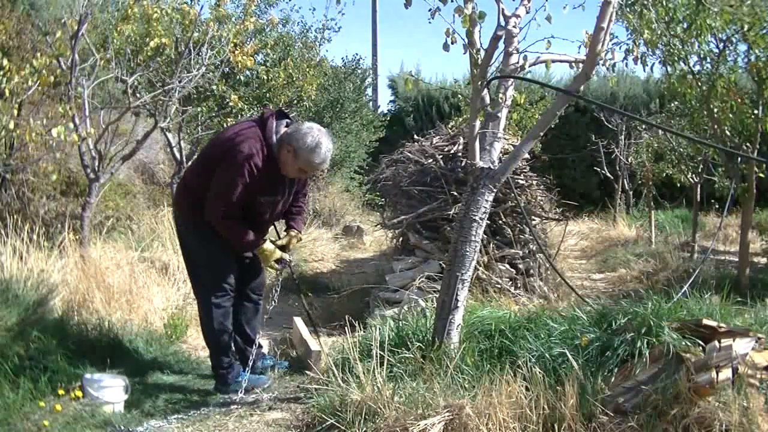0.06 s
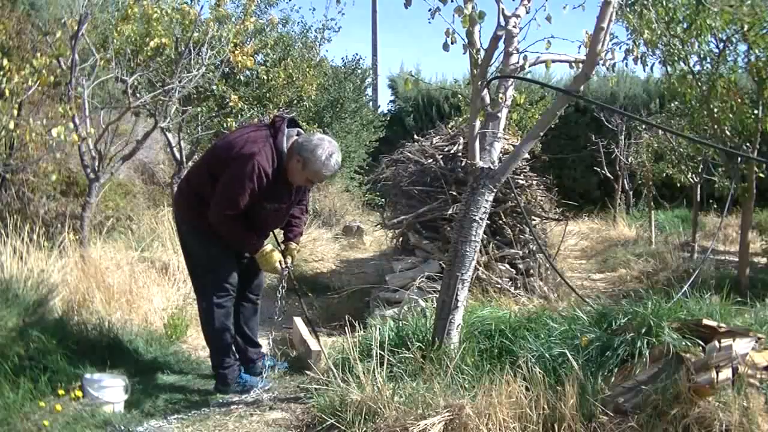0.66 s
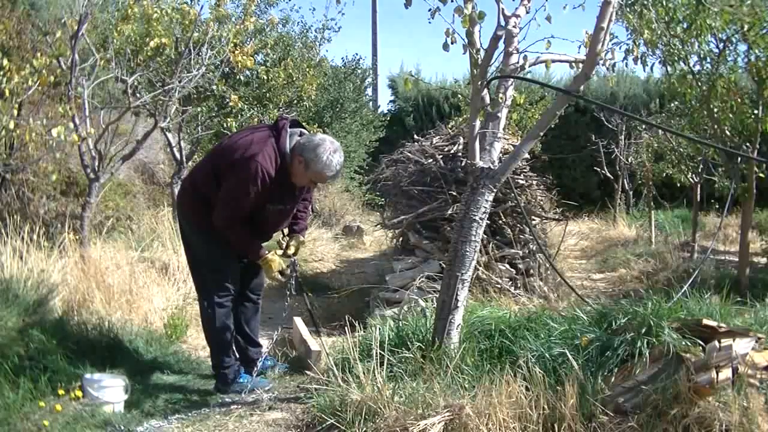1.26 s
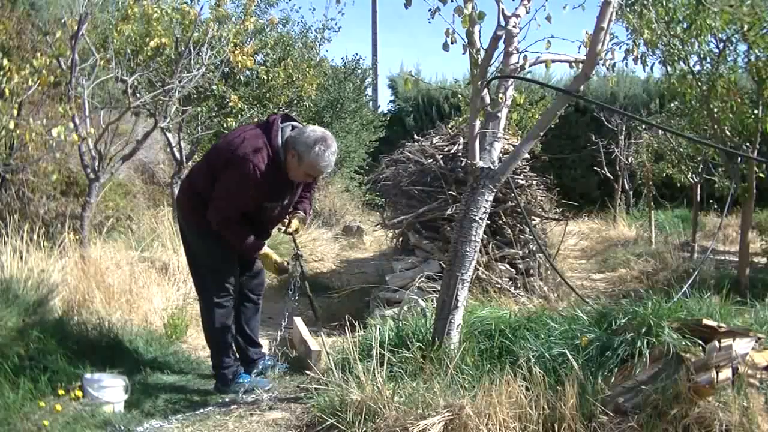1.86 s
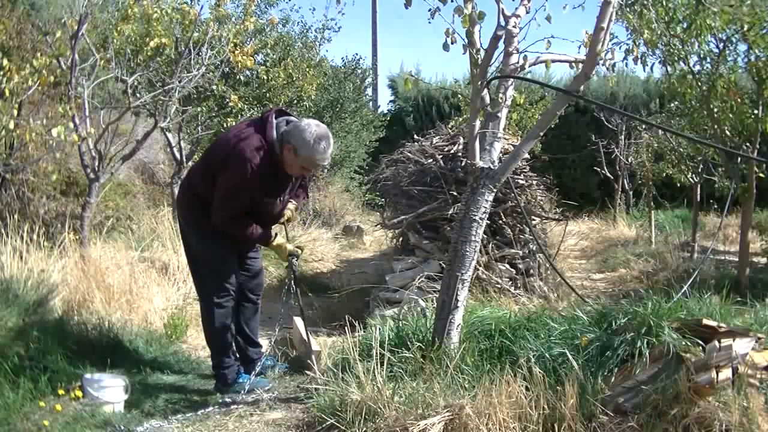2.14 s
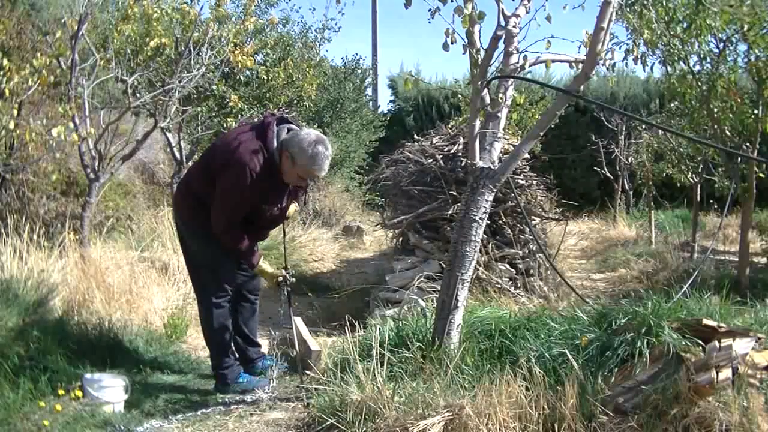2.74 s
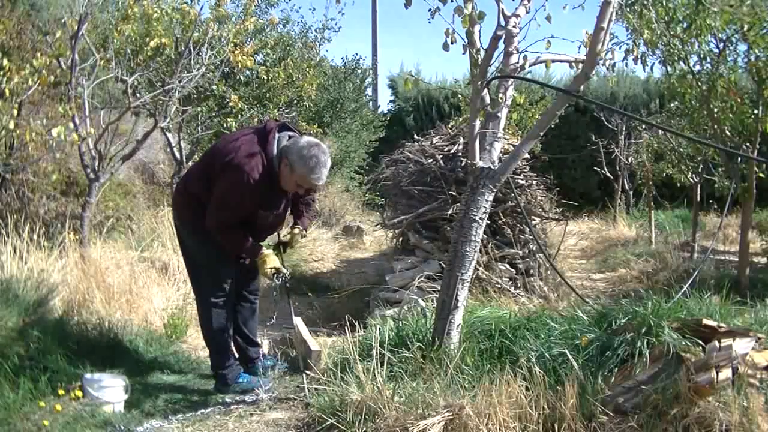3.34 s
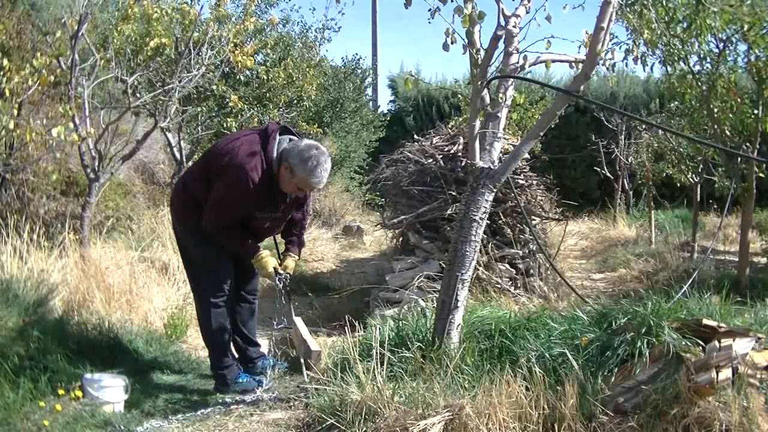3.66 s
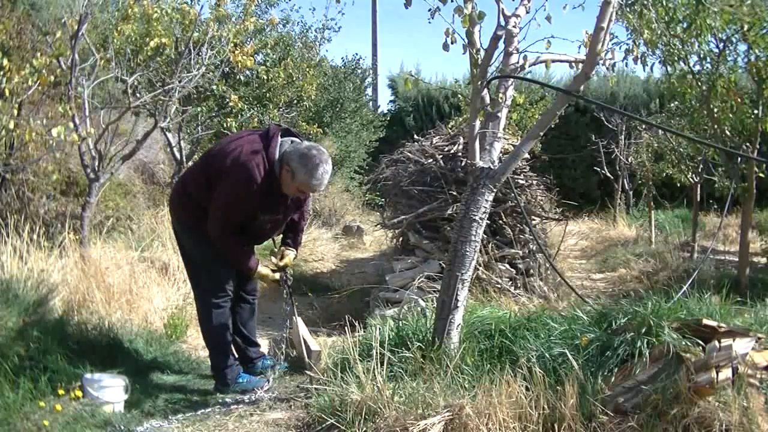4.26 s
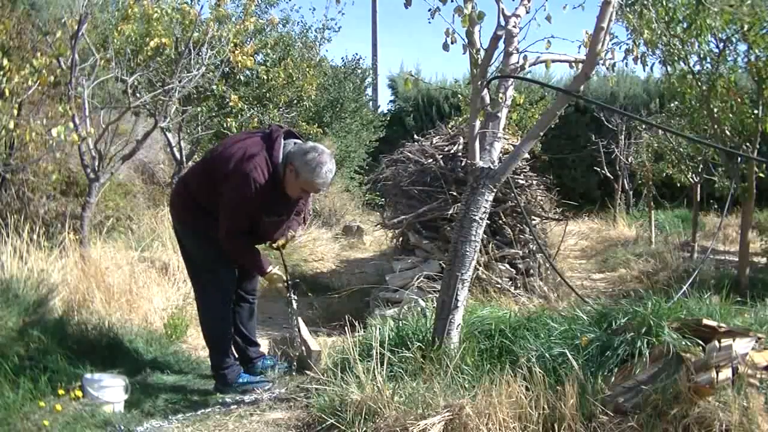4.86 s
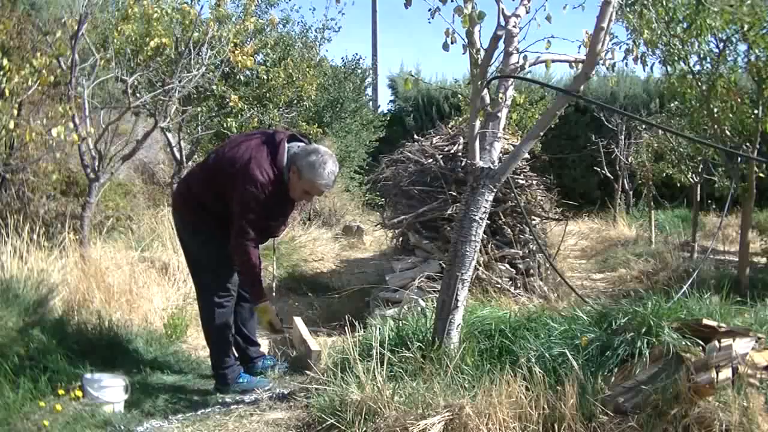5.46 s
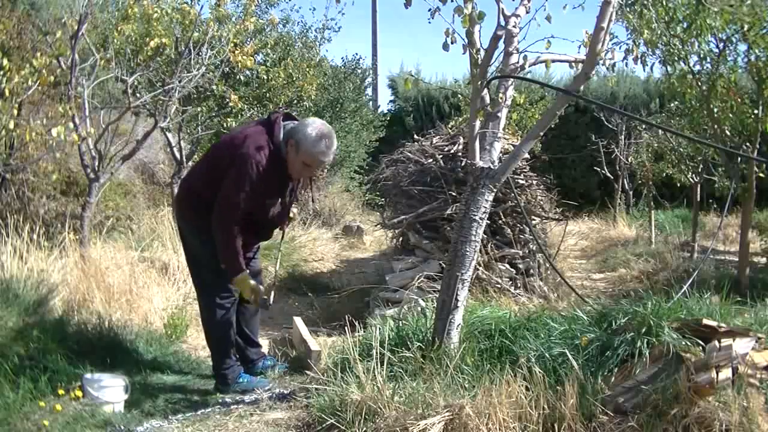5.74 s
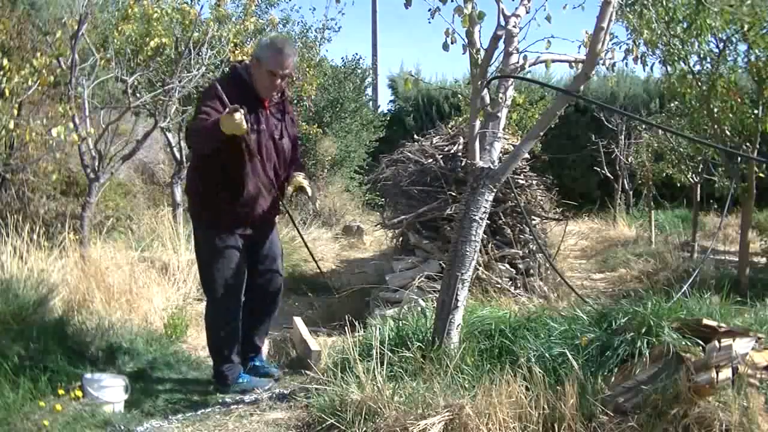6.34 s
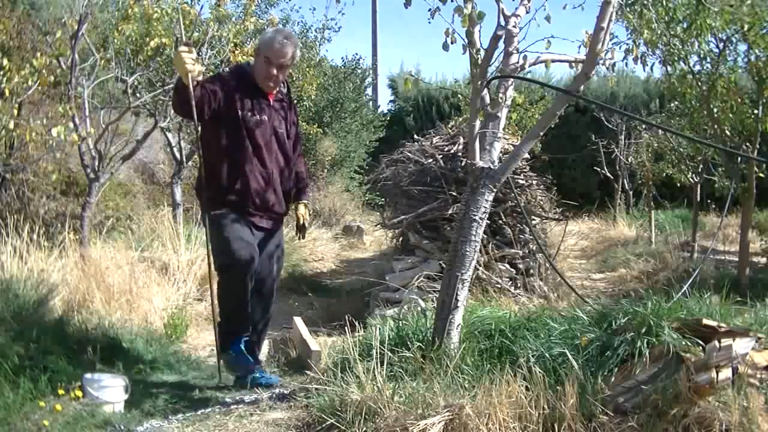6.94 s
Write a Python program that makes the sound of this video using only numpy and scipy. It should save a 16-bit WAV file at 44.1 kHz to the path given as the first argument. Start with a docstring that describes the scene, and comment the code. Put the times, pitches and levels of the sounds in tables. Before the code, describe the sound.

Dry metallic ticks and jerky, ringing scrapes come from a chain working a steel rod out of the soil, heard outdoors from a few metres away. Two brief pulls give way to faint chirps from a bird in the trees. More tugs then build to the longest, loudest grinding rattle, ending in a gritty slither. Soft cloth and grass rustle, a few stalks snap, and a low murmur and hiss continue underneath.

```python
"""A quiet orchard, stereo microphones a few metres from a steel rebar being chained out of the ground.
Between short tugs come three pulls, in which the ribs grind through the links in jerks and ring the
bar; links tick as they seat. Gloves and dry grass rustle, stalks snap, the bar slides free of the
soil. Farther off a small bird twitters in the trees, over a distant murmur and microphone hiss."""
import sys
import numpy as np
from scipy import signal
from scipy.fft import rfft, irfft
from scipy.io import wavfile
from scipy.ndimage import uniform_filter1d

SR = 44100
rng = np.random.default_rng(int(sys.argv[2]) if len(sys.argv) > 2 else 0)


def int16_out(signal):
    """Quantize to a 16-bit WAV file."""
    q = np.round(np.clip(np.atleast_2d(signal).T, -1, 1) * 32767)
    wavfile.write(sys.argv[1], SR, q.astype(np.int16))


N = 308250
TAPS = 4096
HZ, TIME = np.fft.rfftfreq(TAPS, 1 / SR), np.arange(N) / SR

# spectrum of the distant murmur and microphone hiss: f/Hz, level/dB
AIR_COLOUR = [(15, -46), (25, -5.5), (71, -4.5), (183, -3), (246, -2.5), (281, -3.5), (421, -5.5),
              (469, -10), (537, -9), (582, -13.5), (1490, -15.5), (1950, -12.5), (3340, -11), (7910, -14.5),
              (15500, -21)]
# how alike that air is at the two microphones: f/Hz, correlation
AIR_COHERENCE = [(60, 0.93), (150, 0.15), (380, 0.24), (950, 0.11), (2380, 0.074), (5980, 0.041),
                 (15000, 0.081)]
# a little wind, soil giving way, a hazy far call: t/s, length/s, level/dB, f/Hz, width/octaves
SWELLS = [(0, 0.42, -65, 103, .9), (5.432, 0.098, -60, 213, 0.81), (6.499, 0.46, -67.5, 2040, 0.14)]
# gloves, sleeves and dry grass: t/s, level/dB
RUSTLE_LEVEL = [(0, -55.5), (.33, -57), (.48, -61.5), (1, -59), (1.2, -56.5), (2.1, -58.5), (2.65, -53.5),
                (2.85, -60.5), (3.45, -62), (3.65, -58), (4.2, -62), (5.53, -66), (5.62, -68.5),
                (6.08, -64), (6.25, -61.5), (6.99, -65.5)]
# spectrum of that rustle: f/Hz, level/dB
RUSTLE_COLOUR = [(400, -15.5), (1400, -12), (2200, -1), (3500, 0.5), (5300, 1), (6800, -11.5), (9500, -9),
                 (15000, -24)]
# a dull creak, dry stalks snapping and crumbs of soil falling: t/s, level/dB, decay/s, f/Hz
CREAK_AND_SNAPS = [(0.545, -53, 0.0087, 2200), (3.59, -48.5, 0.025, 2800), (3.828, -49.5, 0.015, 3320),
                   (5.5, -39.5, 0.02, 7140), (5.622, -49, 0.0073, 3500), (5.943, -46, 0.0047, 2560),
                   (6.803, -50.5, 0.031, 3240)]
# bending modes of the ribbed bar, most in close pairs: f/Hz, width/Hz, height over contact noise/dB
BAR_MODES = [(933, 156, 10.5), (1616, 19, 12.5), (1872, 62, 13.5), (2156, 65, 17.5), (2461, 67, 13),
             (2770, 76, 15.5), (2720, 15, 17.5), (3020, 11, 9), (3092, 97, 11.5), (3380, 56, 4.5),
             (3500, 53, 13), (3824, 22, 8.5), (3843, 40, 11.5), (4200, 13, 11), (4210, 12, 17.5),
             (4576, 130, 10), (4700, 77, -14), (5025, 93, 8.5), (5030, 26, 15.5), (5420, 53, 11),
             (5460, 95, 15), (5830, 21, 20), (6460, 37, 18.5), (6630, 25, 7.5), (6850, 35, 7),
             (7030, 16, 18.5), (7800, 19, -24)]
# spectrum of the grinding contact: f/Hz, level/dB
CONTACT_COLOUR = [(300, -64), (650, -23), (950, -19), (1400, -9), (1900, -7), (3000, 0.5), (4900, 2.5),
                  (6100, -8.5), (7500, -14), (9400, -9), (11200, -23.5), (12800, -19), (14000, -46),
                  (15800, -26)]
# short tugs and sharp catches of the chain: t/s, length/s, effort/dB, body (the bar's low ring)/dB
TUGS = [(0.84, 0.031, -50, -3.5), (1.058, 0.035, -50.5, -5), (1.138, 0.085, -49.5, -8),
        (1.322, 0.027, -47, 4.5), (1.462, 0.0024, -41, 3.5), (1.821, 0.12, -53, -8.5),
        (1.844, 0.023, -42, -8.5), (2.023, 0.033, -54.5, -6), (2.4, 0.015, -47.5, -11),
        (2.513, 0.046, -47, -8), (4.045, 0.064, -47, -11), (4.117, 0.086, -51, -15),
        (4.211, 0.033, -56, -14), (4.328, 0.03, -56, -6), (4.375, 0.027, -50.5, -14),
        (4.5, 0.013, -45, -18), (4.643, 0.023, -35.5, -9), (4.736, 0.011, -48, -1),
        (4.845, 0.021, -36, 0.5), (4.917, 0.014, -36, 0.5)]
# the loudest links knocking and seating: t/s, level/dB, f/Hz
LINK_TICKS = [(0.8541, -26, 4200), (0.9458, -32, 4600), (1.022, -42, 4300), (1.064, -38, 4100),
              (1.1395, -26, 4070), (1.188, -24.5, 4420), (1.197, -25, 4100), (1.2139, -28, 4800),
              (1.3932, -25.5, 4900), (1.4745, -23, 4470), (1.6815, -22.5, 4400), (2.175, -21, 4070),
              (2.3561, -24, 5360), (2.5328, -27.5, 5530), (2.641, -30, 5070), (2.756, -30, 4300),
              (3.832, -33, 3600), (4.0705, -28, 4700), (4.1401, -30, 6600), (4.3829, -35, 4370),
              (4.7804, -18.5, 4200), (5.24, -18, 3600), (5.3582, -21, 3700), (5.4628, -21.5, 5300),
              (5.4843, -20, 5650), (6.2784, -41, 3740)]
# the chain takes up the load: t/s, effort/dB, favoured f/Hz
FIRST_PULL = [(1.235, -57, 2470), (1.277, -39, 2420), (1.301, -52.5, 2280), (1.333, -39, 2160),
              (1.379, -51.5, 2200), (1.393, -44.5, 2310), (1.403, -47, 2400), (1.475, -45.5, 2200),
              (1.481, -55.5, 2240), (1.521, -53, 2270), (1.535, -41, 2200), (1.567, -58, 2240),
              (1.627, -42.5, 2510), (1.649, -45.5, 2330), (1.677, -40.5, 2190), (1.73, -67, 2230)]
# the bar gives with one short lurch: t/s, effort/dB, favoured f/Hz
LURCH = [(2.13, -67, 3350), (2.178, -32.5, 2960), (2.206, -33.5, 2960), (2.216, -31, 2930),
         (2.234, -37.5, 3010), (2.26, -29.5, 3500), (2.312, -31.5, 3560), (2.336, -47, 3680),
         (2.354, -51, 3860), (2.38, -55, 4350)]
# the bar is drawn all the way out: t/s, effort/dB, favoured f/Hz
LONG_PULL = [(4.49, -82, 3290), (4.514, -42.5, 3690), (4.598, -42, 3330), (4.644, -42, 3020),
             (4.722, -43.5, 3240), (4.816, -31.5, 4100), (4.836, -36.5, 4260), (4.854, -29, 4420),
             (4.902, -35, 4150), (4.926, -36.5, 3800), (4.954, -41.5, 3680), (5.002, -38.5, 4140),
             (5.038, -35, 3200), (5.09, -32.5, 3880), (5.126, -46, 3260), (5.156, -36, 3160),
             (5.218, -32.5, 3650), (5.27, -29.5, 3210), (5.322, -34.5, 3540), (5.36, -30, 3760),
             (5.4, -44.5, 3920), (5.47, -44, 4350)]
# the pulls: curve, first and last body under light load/dB, lowest mode's lift at mid-pull/dB
PULLS = [(FIRST_PULL, -6.3, -1.7, -2.5), (LURCH, -5.5, -11.5, -0.54), (LONG_PULL, -6, -9.5, 0.81)]
# the bird's rising chirps, single or doubled: t/s, top f/Hz, level/dB, count
CHIRPS = [(2.839, 4140, -54.5, 1), (2.904, 4300, -55, 1), (3.006, 4290, -50.5, 1), (3.095, 4200, -53, 2),
          (3.226, 4490, -52, 1), (3.306, 4050, -50.5, 1), (3.447, 4050, -52, 2), (3.764, 4180, -53.5, 2),
          (3.9, 5320, -52, 2), (4.273, 4410, -59.5, 1), (6.152, 5300, -61.5, 1), (6.185, 4100, -58, 1)]
# its whistles, which glide and level off: t/s, length/s, first f/Hz, last f/Hz, level/dB
WHISTLES = [(2.73, 0.037, 5570, 5650, -57.5), (2.875, 0.046, 4300, 4700, -52),
            (3.138, 0.032, 5620, 5100, -47.5), (3.242, 0.027, 4160, 4390, -50.5),
            (3.333, 0.0655, 5000, 4615, -51), (3.561, 0.034, 6030, 6300, -56.5),
            (3.673, 0.042, 5750, 5230, -47.5), (4.015, 0.046, 5450, 5020, -53.5),
            (6.382, 0.056, 4120, 4090, -53), (6.434, 0.056, 4000, 3410, -61.5)]
# ground scatter between the microphones: f/Hz, side over mid/dB
GROUND_WIDTH = [(700, -9.5), (1400, -14), (2400, -18.5), (4400, -13), (8000, -3), (15000, -2.5)]
# decay among the trees, before stretching: f/Hz, T60/s
ORCHARD_T60 = [(500, 0.34), (2500, 0.28), (5000, 0.47), (9000, 0.57), (15000, 0.18)]

HARD_DB, TIGHT_DB = -31, -45.5  # a hard effort, and the effort above which the chain clamps the bar
BODY_LOSS, GRIT_LOSS = 0.38, 0.28  # dB of low ring and of treble grit lost per dB of clamping
LOOSE_LINK_HZ = 4034  # pitch that a loose link favours


def amp(db):
    """Decibels to gain."""
    return 10 ** (np.asarray(db) / 20)


def unit(x):
    """Scales to rms 1."""
    return x / np.sqrt(np.mean(x ** 2) + 1e-20)


def read(points, hz):
    """Reads a spectrum table on a log-frequency axis."""
    f, value = np.transpose(points)
    return np.interp(np.log(hz + 1), np.log(f + 1), value)


def hump(hz, centre_hz, octaves):
    """A bell of height 1 on a log-frequency axis."""
    return np.exp(-.5 * (np.log2((hz + 1) / centre_hz) / octaves) ** 2)


def add(mix, s, sound):
    """Mixes a sound in at time s."""
    part = mix[max(round(s * SR), 0):][:len(sound)]
    part += sound[:len(part)]


def tint(x, points):
    """Filters by a spectrum table."""
    return irfft(rfft(x) * amp(read(points, np.fft.rfftfreq(N, 1 / SR))), N)


def causal(gain):
    """The impulse response that has this gain and rings only after the blow."""
    log_gain = np.log(np.maximum(gain, gain.max() * 1e-5))
    mirrored = np.concatenate([log_gain, log_gain[-2:0:-1]])
    return np.fft.ifft(np.exp(np.conj(signal.hilbert(mirrored)))).real


def band_rms(gain, low_hz, high_hz):
    """The rms that white noise has in one band after this gain."""
    return np.sqrt(np.mean(gain ** 2 * (HZ > low_hz) * (HZ < high_hz)))


def grains(count, per_s, spread_db, smooth):
    """Tiny impacts of very uneven size over a smooth hiss."""
    size = amp(spread_db * np.minimum(rng.exponential(1, count), 3.5))
    hits = size * rng.choice([-1, 1], count) * (rng.random(count) < per_s / SR)
    return unit(unit(hits) + smooth * rng.standard_normal(count))


def air(level_db=-61.5, whine_hz=7800, whine_db=-80, lean_db=0.94):
    """Distant murmur and microphone hiss, leaning left, with the equipment's faint whine."""
    hz = np.fft.rfftfreq(N, 1 / SR)
    left, unrelated = rfft(rng.standard_normal((2, N)))
    coherence = read(AIR_COHERENCE, hz)
    right = coherence * left + np.sqrt(1 - coherence ** 2) * unrelated
    pair = irfft(np.array([left, right]) * amp(read(AIR_COLOUR, hz)), N)
    pair *= amp(level_db) / pair.mean(0).std()
    whine = amp(whine_db) * unit(np.sin(2 * np.pi * whine_hz * TIME))
    return pair * amp([[lean_db], [-lean_db]]) + whine


def swells():
    """Wind, yielding soil and a far call: soft bands of noise that fade in and out."""
    out, hz = np.zeros(N), np.fft.rfftfreq(N, 1 / SR)
    for s, length, db, centre_hz, octaves in SWELLS:
        band = unit(irfft(rfft(rng.standard_normal(N)) * hump(hz, centre_hz, octaves), N))
        count = int(length * SR)
        add(out, s, amp(db) * band[:count] * signal.windows.tukey(count, .6))
    return out


def rustle(clump_db=2):
    """Close by, cloth and straw crackle finely, in small clumps, as the hands work."""
    clumps = unit(uniform_filter1d(rng.standard_normal(N), size=1200))
    fibres = grains(N, per_s=1300, spread_db=3.5, smooth=0.92) * amp(clump_db * clumps)
    return amp(np.interp(TIME, *np.transpose(RUSTLE_LEVEL))) * unit(tint(fibres, RUSTLE_COLOUR))


def creak_and_snaps(octaves=0.87):
    """A dull creak, snapping stalks and falling crumbs: short clusters of tiny impacts with no ring."""
    out, t = np.zeros(N), np.arange(TAPS) / SR
    for s, db, decay, hz in CREAK_AND_SNAPS:
        cluster = grains(TAPS, per_s=3000, spread_db=0.5, smooth=1.0) * np.exp(-t / decay)
        gain = hump(HZ, hz, octaves) / np.sqrt(1 + (HZ / (2 * hz)) ** 8)
        add(out, s, amp(db) * signal.fftconvolve(cluster, causal(unit(gain))))
    return out


def bar_response(favoured_hz, favour_db=9.0, feed_db=2, detune=0.0018):
    """The bar's gain at one contact point, which feeds and loads each mode by its own amount."""
    hz, width, db = np.transpose(BAR_MODES)
    feed, load = rng.standard_normal((2, len(hz)))
    db = db + favour_db * hump(hz, favoured_hz, octaves=0.022) + feed_db * feed
    hz = hz * (1 + detune * load)
    peaks = amp(db)[:, None] ** 2 / (1 + (2 * (HZ - hz[:, None]) / width[:, None]) ** 2)
    return np.sqrt(1 + peaks.sum(0))


def jerk(length, effort_db, body_db, favoured_hz, deep_db=-1, grit_db=-10, fall_s=0.0074, sag_db=1.5):
    """A burst of micro-slips rings the bar; effort shapes attack and colour, the caller sets level."""
    t = np.arange(8192) / SR
    bite_s = 0.00059 * amp(.5 * (HARD_DB - effort_db))  # a hard jerk bites at once, a light one swells
    stroke = (1 - np.exp(-t / bite_s)) * np.exp(-np.maximum(t - length, 0) / fall_s)
    stroke *= amp(sag_db * (.5 - np.minimum(t / length, 1)))
    slips = grains(len(t), per_s=2600, spread_db=4.0, smooth=0.53) * stroke
    grip = amp(4 * hump(HZ, favoured_hz, octaves=0.16))  # the loaded link is a broad resonance
    gain = amp(read(CONTACT_COLOUR, HZ)) * grip * bar_response(favoured_hz)
    gain /= band_rms(gain, 2550, 7000)  # body and grit are set against this middle band
    clamp_db = max(effort_db - TIGHT_DB, 0)
    body = amp(body_db - BODY_LOSS * clamp_db) / band_rms(gain, 1400, 2550)
    grit = amp(grit_db - GRIT_LOSS * clamp_db) / band_rms(gain, 7000, 14000)
    deep = body * amp(deep_db)
    gain *= read([(1100, deep), (1600, body), (2250, body), (2800, 0.96), (5800, 0.97), (8000, grit)], HZ)
    return signal.fftconvolve(slips, causal(gain))


def tugs():
    """Each short tug is a single jerk of a loose link on the bar."""
    out = np.zeros(N)
    for s, length, effort_db, body_db in TUGS:
        add(out, s, amp(effort_db) * jerk(length, effort_db, body_db, LOOSE_LINK_HZ))
    return out


def link_ticks(trim_db=-2.0, skirt_db=-22, chatter=0.26, chatter_s=0.001):
    """Taut links cannot ring: a sharp dry click, then a moment of chatter as they settle."""
    out, t = np.zeros(N), np.arange(TAPS) / SR
    skirt = amp(skirt_db) * hump(HZ, 7500, octaves=1)
    low_cut = 1 / np.sqrt(1 + (1500 / (HZ + 1)) ** 4)
    for s, db, hz in LINK_TICKS + lesser_links():
        gain = (hump(HZ, hz, octaves=0.56) + skirt) * low_cut
        blow = (t == 0) + chatter * rng.standard_normal(TAPS) * np.exp(-t / chatter_s)
        click = signal.fftconvolve(blow, causal(gain))
        add(out, s, amp(db + trim_db) * click / abs(click).max())
    return out


def pull(curve, first_body_db, last_body_db, lowest_db, jerks_per_s=24, scatter_db=2.1):
    """Rib after rib catches and lets go: a run of uneven jerks whose strength follows the effort."""
    s, effort_db, favoured_hz = np.transpose(curve)
    out, count = np.zeros(N), round((s[-1] - s[0]) * jerks_per_s)
    lag, strength, shift = rng.uniform(-1, 1, (count, 3)).T
    starts = np.interp(np.arange(count) + .3 * lag, [0, count], [s[0], s[-1]])
    lengths = np.diff(starts, append=s[-1])
    middles = starts + lengths / 2
    db = np.interp(middles, s, effort_db)
    hz = np.interp(middles, s, favoured_hz) * 2 ** (0.17 * shift)  # the pitch jumps from rib to rib
    body_db = np.linspace(first_body_db, last_body_db, count)
    deep_db = lowest_db + np.linspace(4, -4, count)  # the lowest mode fades through the pull
    for k in range(count):
        slip = jerk(lengths[k], db[k], body_db[k], hz[k], deep_db[k])
        add(out, starts[k], amp(scatter_db * strength[k]) * slip)
    return out * amp(np.interp(TIME, s, effort_db))


def lesser_links(count=200, per_s=20, over_effort_db=7.5, centre_hz=4300, scatter_octaves=.15):
    """Links shift at random during the pulls, louder with more effort: rows of t/s, level/dB, f/Hz."""
    times = np.cumsum(rng.exponential(1 / per_s, count))
    pitches = centre_hz * 2 ** (scatter_octaves * rng.standard_normal(count))
    rows = []
    for curve, *_ in PULLS:
        s, effort_db, _ = np.transpose(curve)
        levels = np.interp(times, s, effort_db) + over_effort_db
        rows += [(t, db, hz) for t, db, hz in zip(times, levels, pitches) if s[0] < t < s[-1]]
    return rows


def bird_note(length, pitches, waver=.014, flutter_db=3.0):
    """A quick, nearly pure glide through three pitches, fluttering on its way through the leaves."""
    progress = np.linspace(0, 1, int(length * SR))
    wobble, flutter = uniform_filter1d(rng.standard_normal((2, TAPS)), size=60)[:, :len(progress)]
    glide = np.polyval(np.polyfit([0, .5, 1], pitches, 2), progress)
    hz = glide * (1 + waver * unit(wobble))
    swell = np.sin(np.pi * progress) * amp(flutter_db * unit(flutter))
    return unit(np.sin(2 * np.pi * np.cumsum(hz) / SR) * swell)


def bird(chirp_s=.028, spacing_s=.024, voice_ratio=1.1, voice_db=-17.5):
    """Off in the trees: rising chirps made raspy by a second voice, and whistles between them."""
    out = np.zeros(N)
    for s, top_hz, db, count in CHIRPS:
        rise = top_hz * np.array([.7, .89, 1])
        for k in range(round(count)):
            chirp = bird_note(chirp_s, rise) + amp(voice_db) * bird_note(chirp_s, voice_ratio * rise)
            add(out, s + k * spacing_s, amp(db) * chirp)
    for s, length, first_hz, last_hz, db in WHISTLES:
        halfway_hz = first_hz + 0.762 * (last_hz - first_hz)
        add(out, s, amp(db) * bird_note(length, [first_hz, halfway_hz, last_hz]))
    return out


def slither(s=5.461, length=0.065, effort_db=-43.0):
    """The tip of the bar slides free: all grit and hardly any ring."""
    out = np.zeros(N)
    slide = jerk(length, effort_db, body_db=-24, favoured_hz=LOOSE_LINK_HZ, grit_db=-3)
    add(out, s, amp(effort_db) * slide)
    return out


def ground_scatter(x, decay_s=.007):
    """Scatter from the ground reaches the two microphones differently, mostly in the treble."""
    t = np.arange(TAPS) / SR
    bounce = rng.standard_normal(TAPS) * np.sqrt(t) * np.exp(-t / decay_s)
    side = tint(signal.fftconvolve(x, bounce / np.linalg.norm(bounce))[:N], GROUND_WIDTH)
    return np.array([x + side, x - side])


def tree_scatter(x, stretch, delay_s, echoes_per_s=2500):
    """Sparse echoes from trunks and hedges, different at each microphone; the very top dies first."""
    taps = rng.standard_normal((2, SR)) * (rng.random((2, SR)) < echoes_per_s / SR)
    hz, t, spectra = signal.stft(taps, SR, nperseg=256)
    t60 = stretch * read(ORCHARD_T60, hz)[:, None]
    tail = signal.istft(spectra * amp(-60 * t / t60), SR, nperseg=256)[1]
    tail = np.pad(tail, ((0, 0), (int(delay_s * SR), 0)))
    return signal.fftconvolve(x[None], tail / np.linalg.norm(tail[0]), axes=1)[:, :N]


def scene(work_wet_db=-14, bird_wet_db=-2.5, hedge_db=-12, hedge_delay_s=0.034):
    """The work is near the microphones and fairly dry; the bird is farther off, echoed by the hedge."""
    grinding = tugs() + sum(pull(*row) for row in PULLS) + slither()
    work = grinding + link_ticks() + rustle() + creak_and_snaps()
    song = bird()
    hedge_echo = amp(hedge_db) * np.interp(TIME - hedge_delay_s, TIME, song)
    near = ground_scatter(work + swells())
    near += amp(work_wet_db) * tree_scatter(work, stretch=0.68, delay_s=.008)
    far = ground_scatter(song + hedge_echo)
    far += amp(bird_wet_db) * tree_scatter(song, stretch=1.05, delay_s=.006)
    return near + far + air()


def record(dry, low_cut_hz=36, edge_hz=15850):
    """The microphones feed a rumble filter and a steep band limit."""
    rumble_filter = signal.butter(N=4, Wn=low_cut_hz, btype="high", fs=SR, output="sos")
    band_limit = signal.firwin(511, edge_hz, window=("kaiser", 9), fs=SR)
    return signal.oaconvolve(signal.sosfilt(rumble_filter, dry), band_limit[None], "same")


dry = scene()
out = record(dry)
int16_out(out)
```